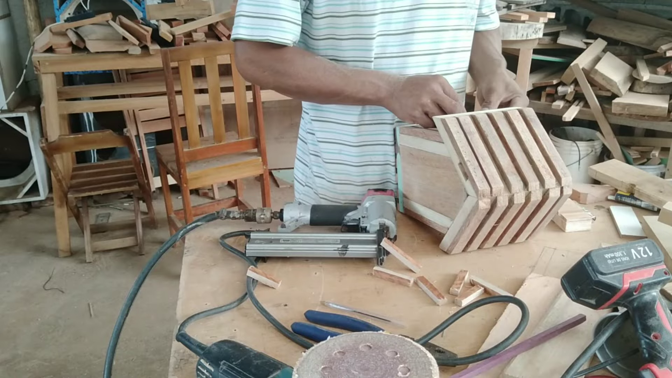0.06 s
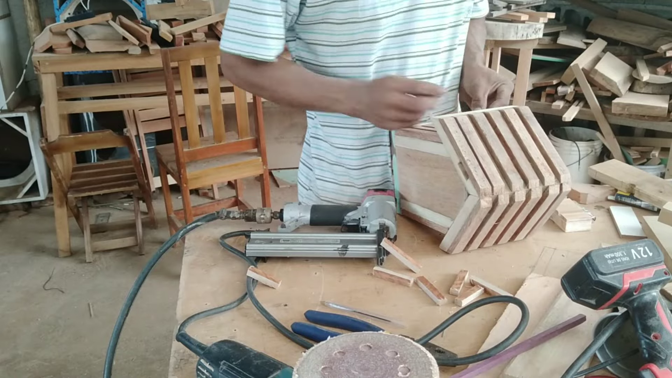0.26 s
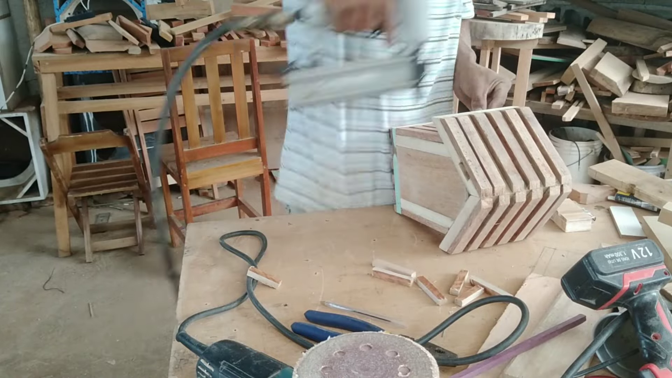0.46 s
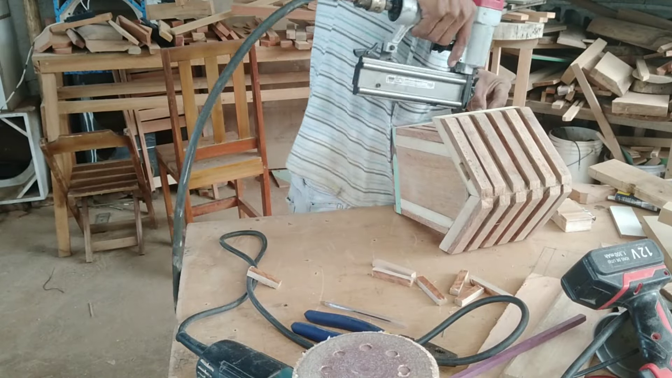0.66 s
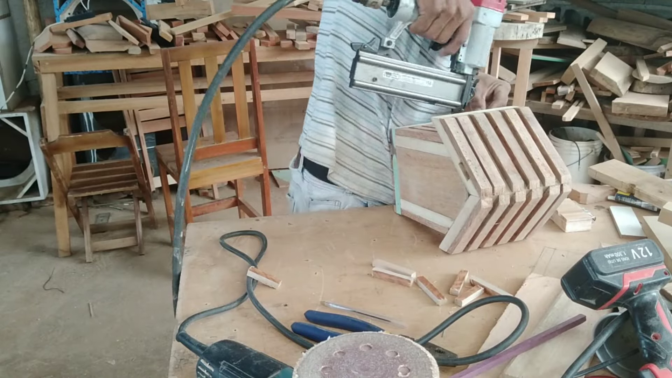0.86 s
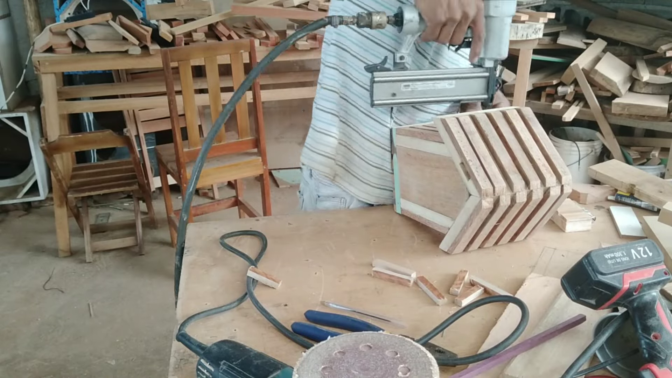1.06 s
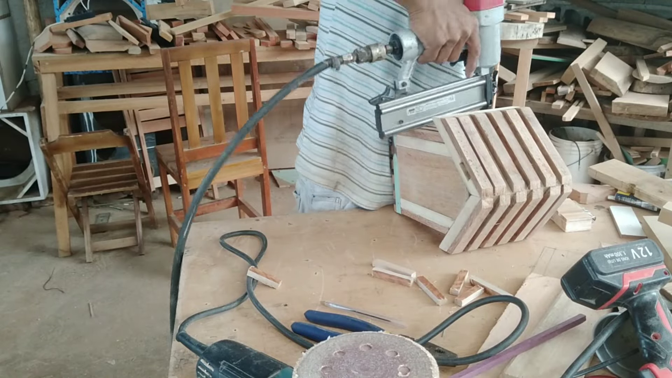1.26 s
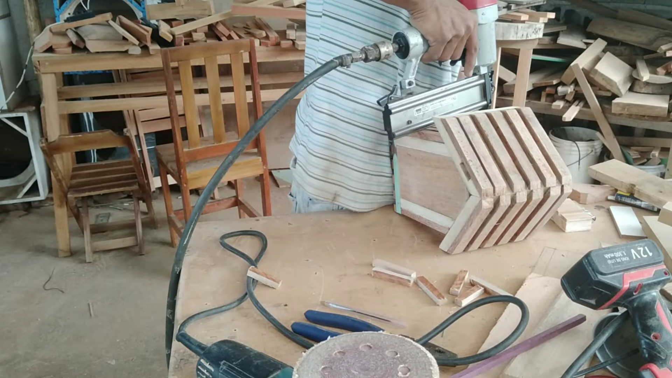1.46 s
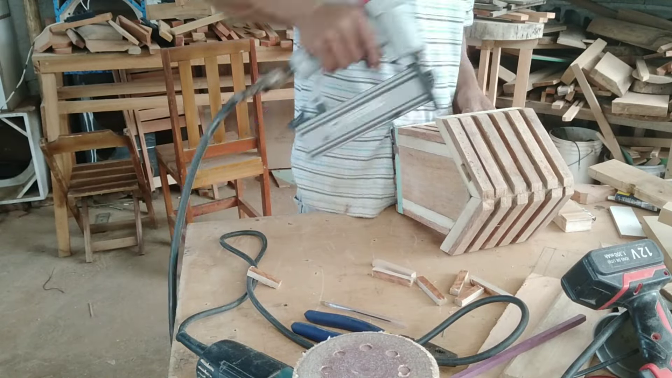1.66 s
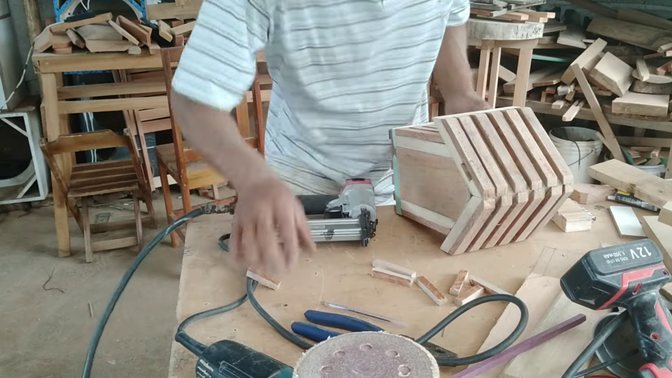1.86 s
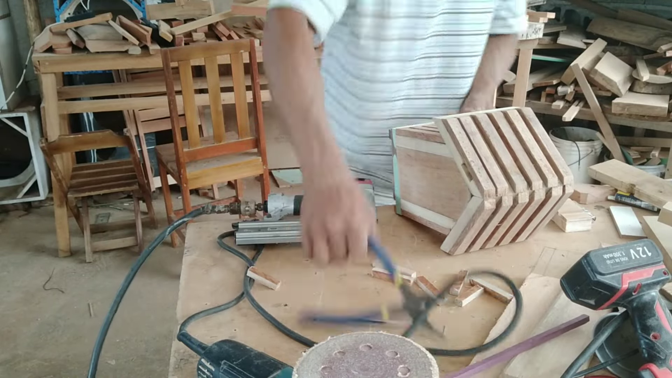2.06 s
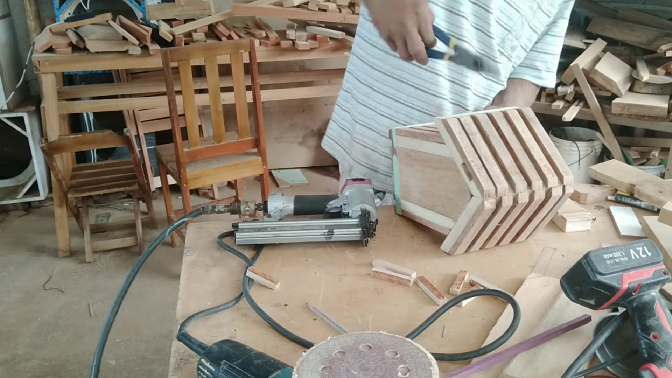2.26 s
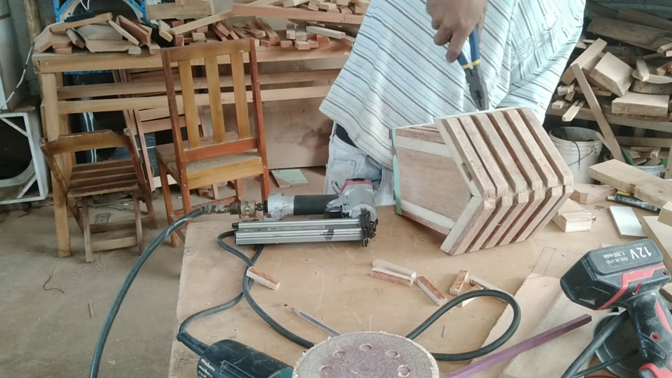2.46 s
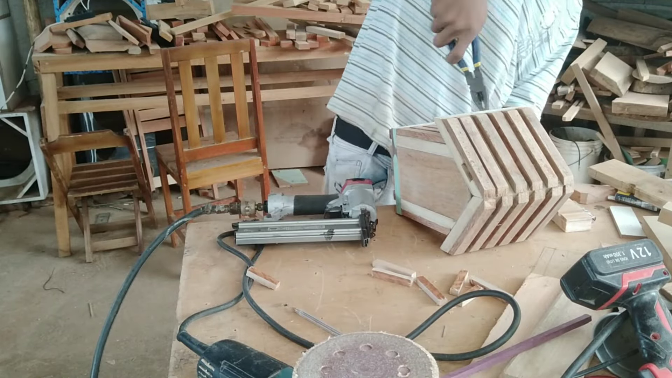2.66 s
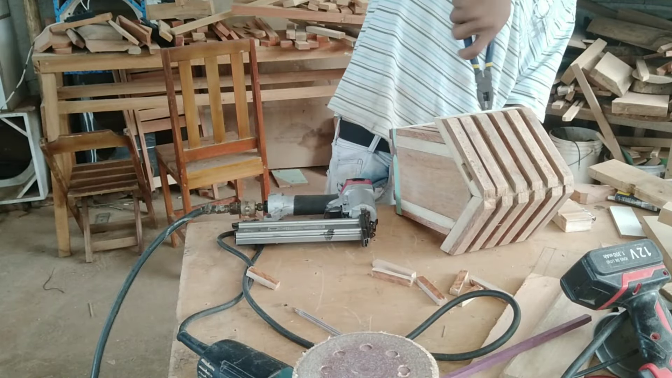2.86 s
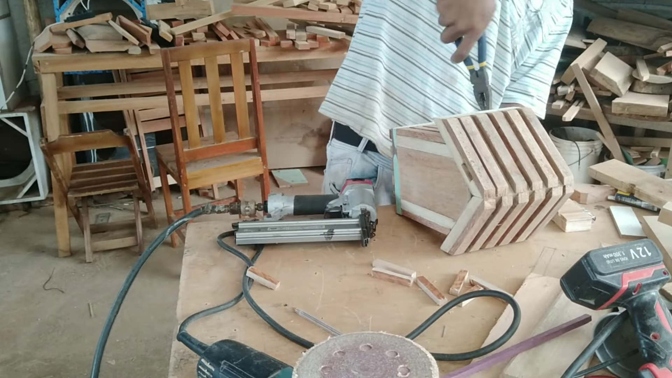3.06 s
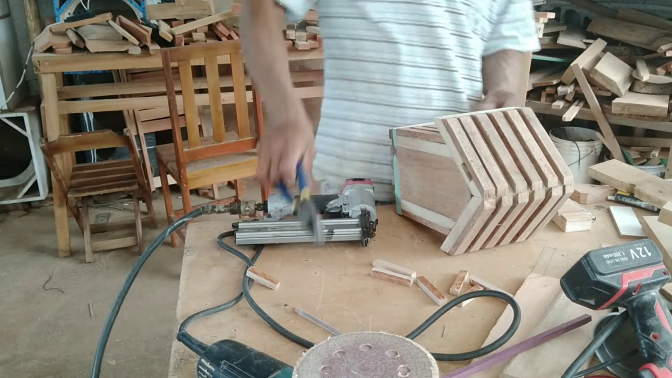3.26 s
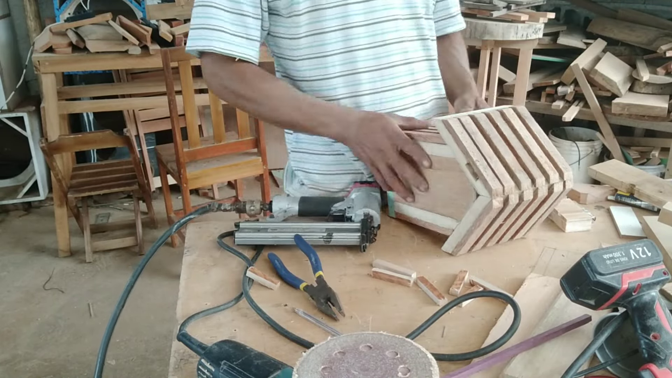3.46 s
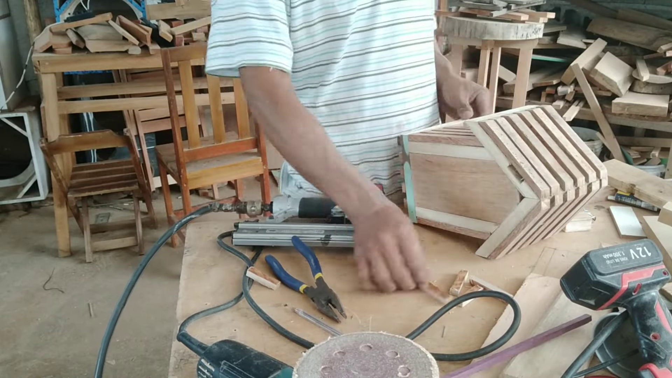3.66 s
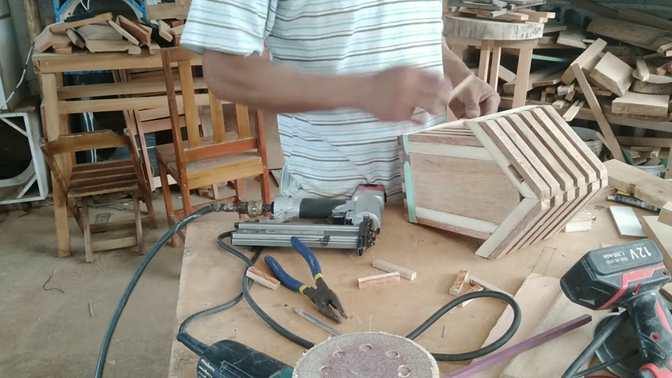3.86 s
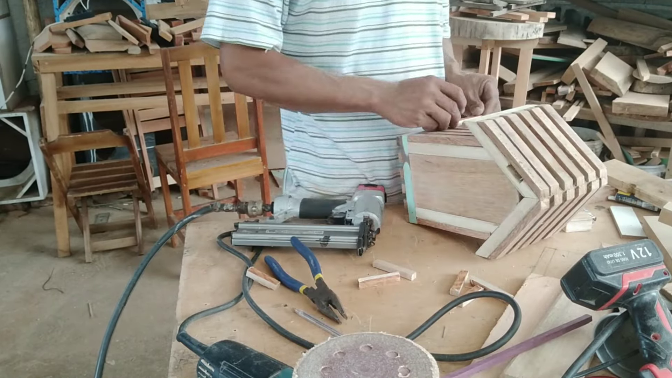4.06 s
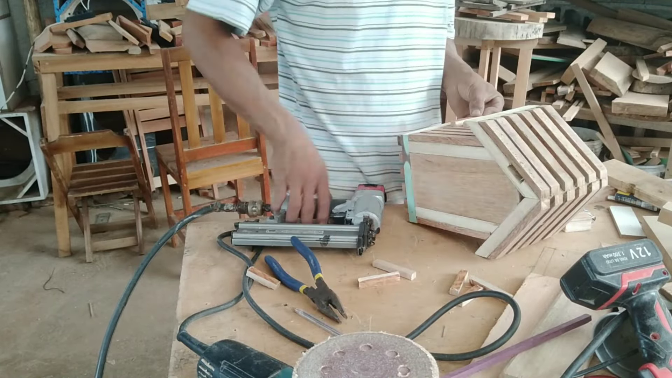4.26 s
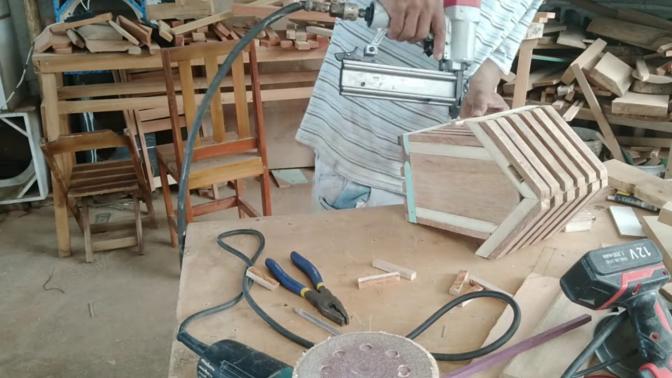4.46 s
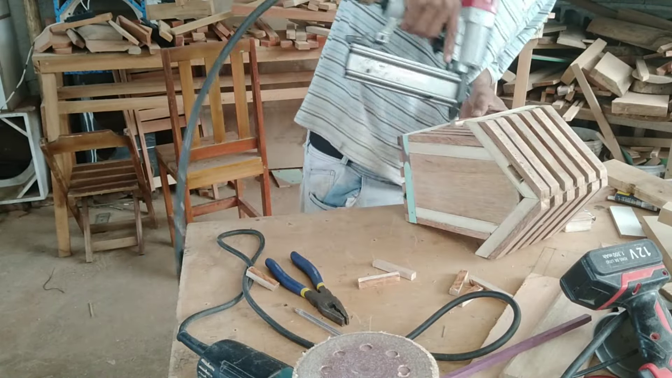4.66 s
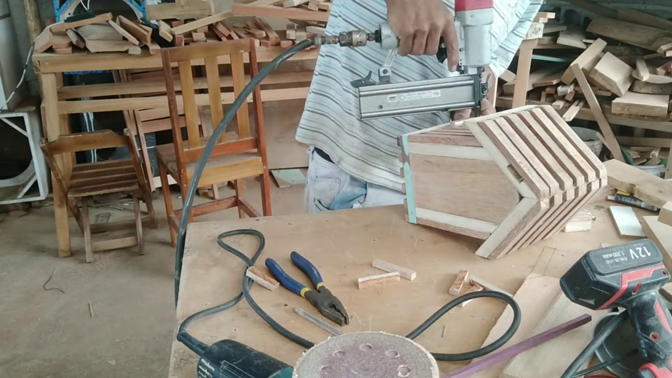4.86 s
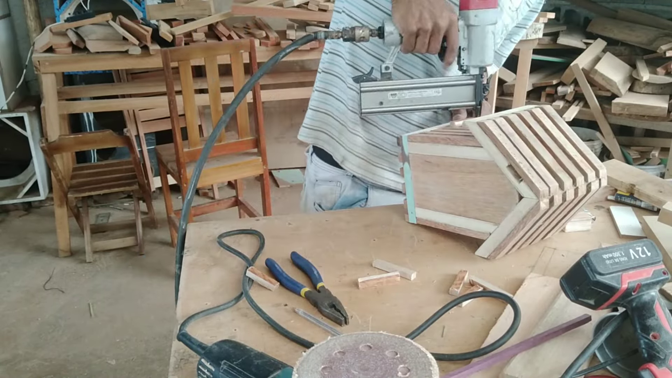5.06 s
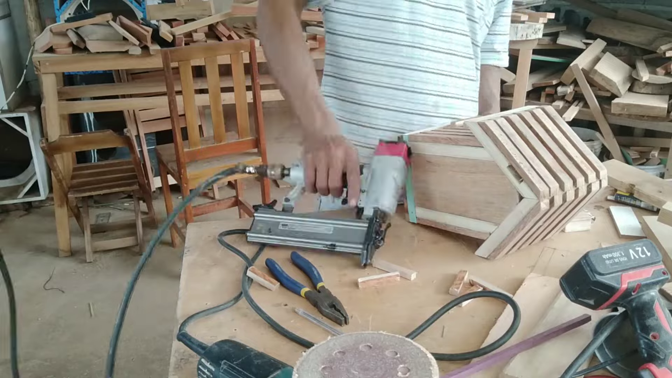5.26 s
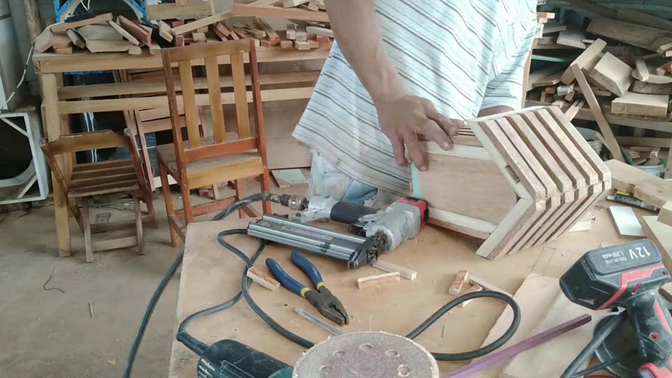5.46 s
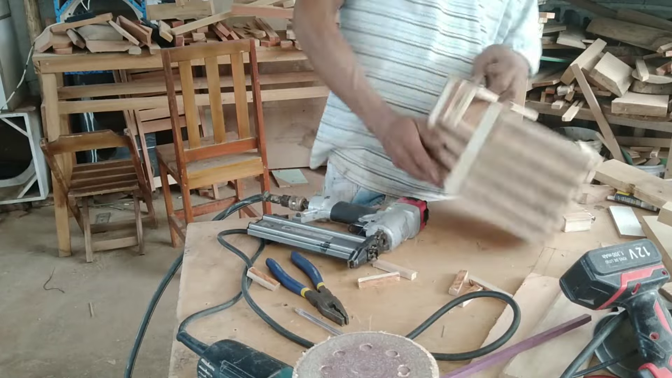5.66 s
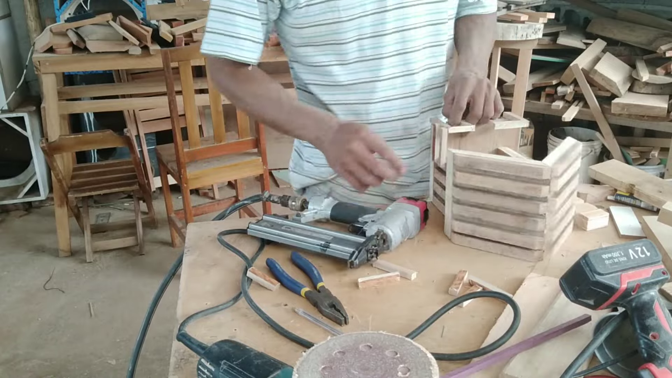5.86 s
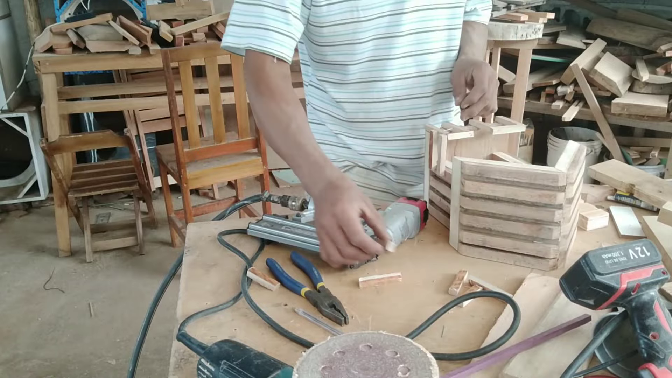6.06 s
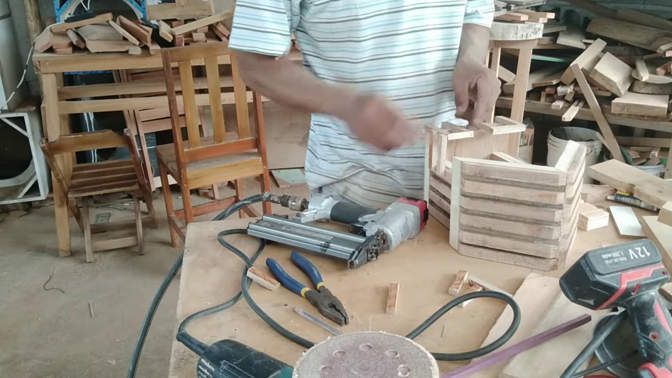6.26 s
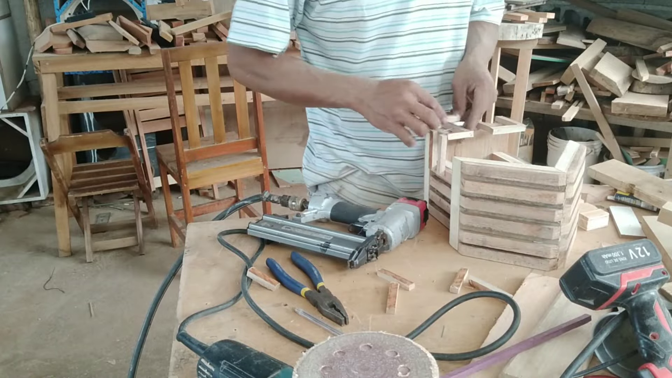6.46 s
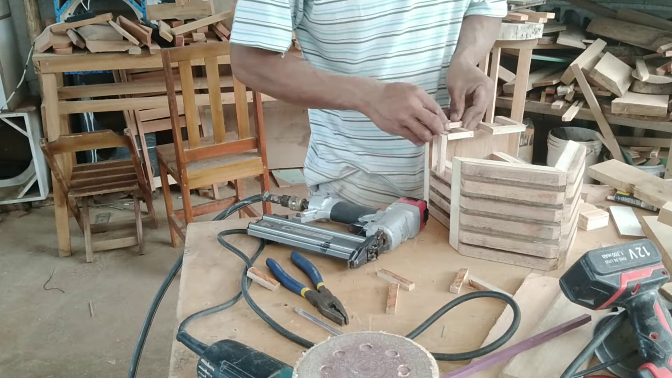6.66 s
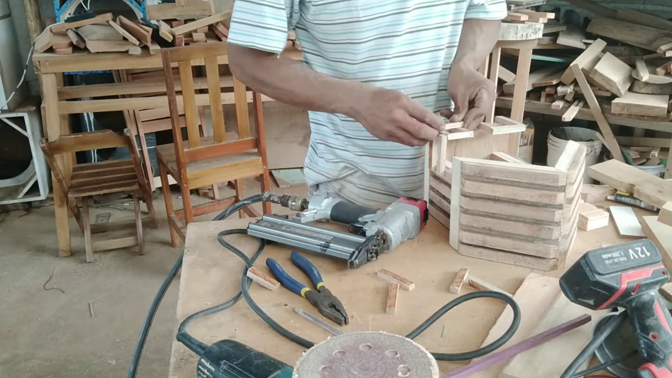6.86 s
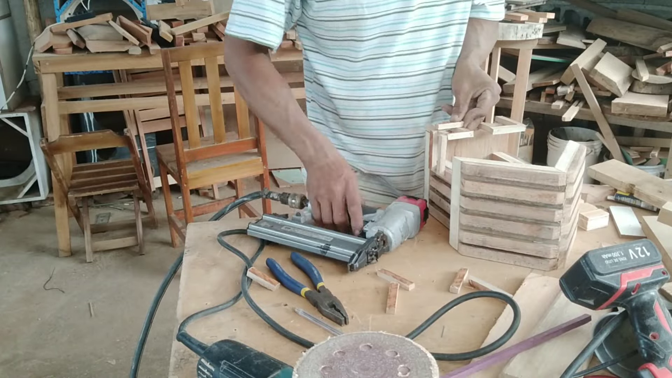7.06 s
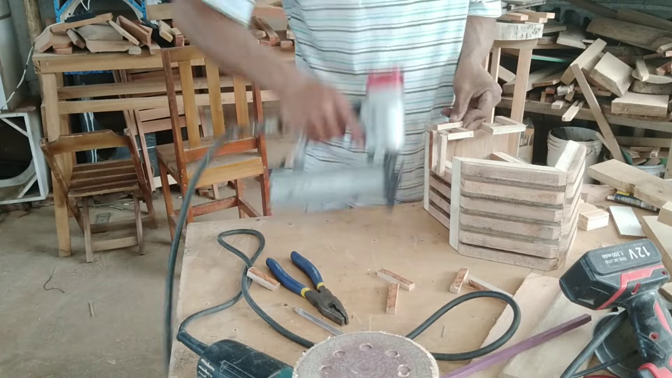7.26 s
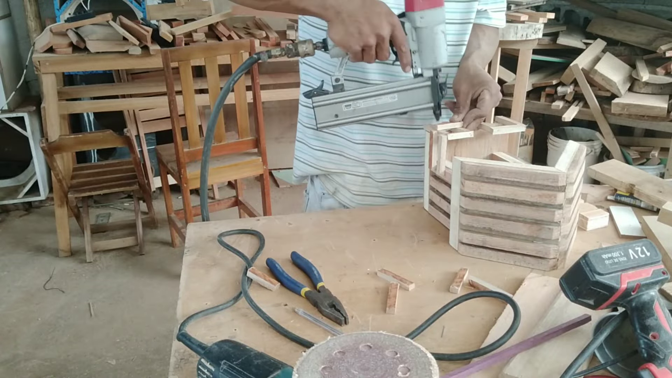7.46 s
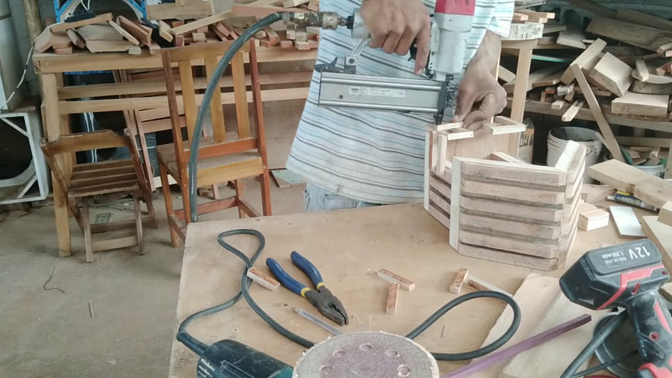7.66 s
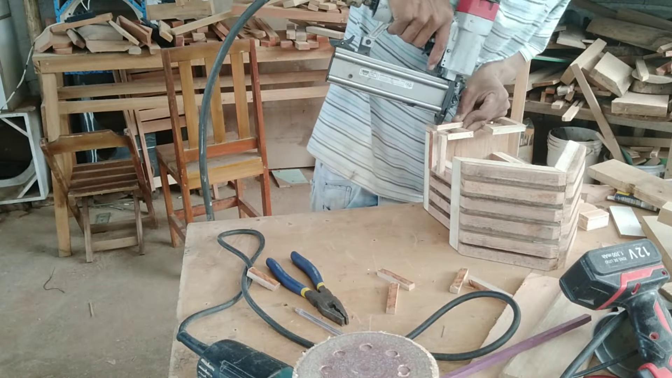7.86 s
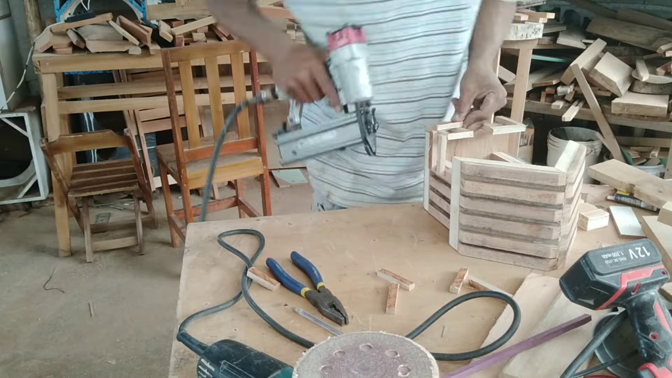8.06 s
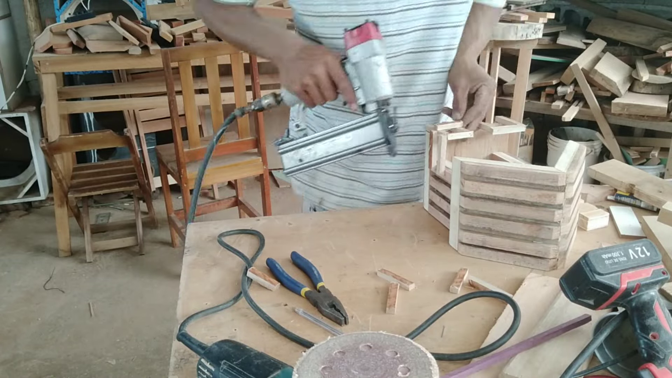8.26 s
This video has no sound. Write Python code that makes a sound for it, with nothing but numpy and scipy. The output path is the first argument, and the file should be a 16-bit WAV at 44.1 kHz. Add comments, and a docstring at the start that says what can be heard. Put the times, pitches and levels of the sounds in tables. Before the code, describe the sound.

Close, nearly dry workshop sound with low rumble and a steady airy hiss. Faint clicks come at 0.4-0.6 s, then a nailer snaps at 0.9 and harder at 1.5, each shot a short metallic chatter plus a puff of air. At 1.75-1.85 the tool clatters onto the bench; duller knocks follow around 2.1. After a quieter gap, pliers land at 3.3 with a hard knock and brief metal ring, followed by dry slat scuffs to 3.6. A heavy bump at 4.36 precedes the loudest, slightly overloaded crack at 4.64 and a lighter shot with strong exhaust at 5.06. The nailer goes down at 5.3-5.45 as the hiss drops away. The crate thuds over at 5.7. Small clicks, soft scuffs and weak hiss swells fill 5.9-7.8, quieter overall, with a modest knock at 7.16. A final snap and puff sound at 7.94, with a brief rise of hiss.

```python
"""Workshop bench: a pneumatic brad nailer fixes thin slats to a small wooden crate, near a phone.
Each shot is a chattering blow of the driver and a puff of exhaust air, made of noise through resonances.
Between shots tools and crate land, click, ring (dying sines) and scuff (noise through a damped mode).
Coloured noise makes a low rumble and a hiss that falls away after five seconds, then returns in swells."""
import sys
import numpy as np
from scipy import signal
from scipy.fft import rfft, irfft
from scipy.io import wavfile
from scipy.ndimage import uniform_filter1d

SR = 44100
rng = np.random.default_rng(int(sys.argv[2]) if len(sys.argv) > 2 else 0)


def persist_wave(psi):
    """Save psi, clipped to +-1, as 16-bit WAV."""
    counts = np.round(np.clip(psi, -1, 1) * 32767).astype(np.int16)
    wavfile.write(sys.argv[1], SR, np.atleast_2d(counts).T)


N = 366471
SIZE = 16384  # samples per event
LEAD = 200  # samples of lead-in before a contact
HZ = np.fft.rfftfreq(SIZE, 1 / SR)


def gain_of(db):
    """Decibels to gain."""
    return 10 ** (np.asarray(db) / 20)


def evened(x):
    """Scales to rms 1."""
    return x / np.sqrt(np.mean(x ** 2) + 1e-20)


def read(points, hz):
    """Reads a table on a log-frequency axis."""
    f, value = np.transpose(points)
    return np.interp(np.log(hz + 1), np.log(f + 1), value)


def level(points):
    """A (time [s], level [dB]) table as a gain for every sample."""
    return gain_of(np.interp(np.arange(N) / SR, *np.transpose(points)))


def add(mix, s, sound):
    """Mixes a sound in at time s."""
    part = mix[:, round(s * SR):][:, :sound.shape[1]]
    part += sound[:, :part.shape[1]]


def shape(colour, modes, hz):
    """A broad colour plus resonance peaks, in dB."""
    peaks_db = sum(db / (1 + (2 * (hz - centre) / width) ** 2) for centre, width, db in modes)
    return read(colour, hz) + peaks_db


# port balance: (frequency [Hz], left-right [dB])
PORT_BALANCE = [(60, -1), (400, 0), (800, -0.5), (1300, 9), (1800, 11.5), (2500, 4.5), (4000, -2.5),
                (6000, -3), (10000, 2), (15000, -2)]
# port likeness, near and diffuse sound: (frequency [Hz], correlation [-1..1])
NEAR_LIKENESS = [(60, 0.4), (130, 0.3), (300, 1), (640, 0.83), (950, 0.3), (1400, -0.52), (3000, -0.1),
                 (15000, 0)]
DIFFUSE_LIKENESS = [(60, 0.83), (130, 0.99), (300, 0.71), (640, 0.6), (1400, -0.31), (3000, 0.027)]


def ports(z, hz, likeness):
    """Two unrelated spectra become two microphone ports, correlated and balanced by frequency."""
    same = np.clip(read(likeness, hz), -1, 1)
    right = same * z[0] + np.sqrt(1 - same ** 2) * z[1]
    lean = gain_of(read(PORT_BALANCE, hz) / 2)
    return np.array([z[0] * lean, right / lean])


def causal(db):
    """Minimum-phase response of a gain curve: it rings only after the blow."""
    log_gain = np.log(gain_of(np.concatenate([db, db[-2:0:-1]])))
    return np.exp(np.conj(signal.hilbert(log_gain)))[:len(HZ)]


def chatter(length_s, rise_s, t60_s, grain_db, punch):
    """Whitened spectrum of a force: a first punch, then uneven micro-impacts that hold and die."""
    t = np.arange(SIZE) / SR
    onset = (1 - np.exp(-t / rise_s)) * (1 + punch * np.exp(-t / 0.0081))
    envelope = onset * gain_of(-60 * np.maximum(t - length_s, 0) / t60_s)
    sizes = gain_of(grain_db * np.repeat(rng.standard_normal(SIZE // 32), 32))
    z = rfft(rng.standard_normal((2, SIZE)) * sizes * envelope)
    return z / np.sqrt(uniform_filter1d(abs(z) ** 2, size=90, axis=1) + 1e-12)


SLAT_WIDTH_HZ, SLAT_LIFT_DB = 290, 6.5


def strikes(rows, colour, modes, rise_s, t60_s, grain_db, punch):
    """A force drives a resonant body: bass and tilt set the contact, struck wood adds its note."""
    bass = 1 / (1 + (HZ / 400) ** 4)
    octaves = np.log2(1 + (HZ / 1200) ** 2) / 2
    # fade-in over the lead, so the burst starts without a step
    fade = np.minimum(np.arange(SIZE // 2) / LEAD, 1) ** 2
    out = np.zeros((2, N))
    for s, db, length_s, bass_db, tilt_db, pan_db, *notes_hz in rows:
        notes = [(hz, SLAT_WIDTH_HZ, SLAT_LIFT_DB) for hz in notes_hz]
        body_db = shape(colour, list(modes) + notes, HZ) + bass_db * bass + tilt_db * octaves
        force = ports(chatter(length_s, rise_s, t60_s, grain_db, punch), HZ, NEAR_LIKENESS)
        sound = irfft(force * causal(body_db))
        sound = np.roll(sound, LEAD, axis=1)[:, :SIZE // 2] * fade
        # level holds over the contact, not over the whole buffer
        sound = evened(sound) * np.sqrt((length_s + t60_s / 10) * SR / (SIZE // 2))
        add(out, s - LEAD / SR, sound * gain_of([[db + pan_db / 2], [db - pan_db / 2]]))
    return out


def rings(rows, modes):
    """A struck part rings in a few dying modes."""
    t, out = np.arange(SIZE) / SR, np.zeros((2, N))
    for s, db, *_ in rows:
        ring = np.zeros(SIZE)
        for hz, mode_db, t60_s in modes:
            ring += gain_of(mode_db - 60 * t / t60_s) * np.sin(2 * np.pi * (hz * t + rng.random()))
        add(out, s, gain_of(db) * (ring * (1 - np.exp(-t / 0.0013)))[None])
    return out


def wash(colour, modes, patchy_db, flutter_db):
    """Steady noise of rms 1: a colour, resonances, drifting patches and a shared flutter."""
    hz, frames = np.fft.rfftfreq(4096, 1 / SR), N // 1024 + 5
    real, imag = rng.standard_normal((2, 2, frames, len(hz)))
    patches = uniform_filter1d(rng.standard_normal((frames, len(hz))), size=5, axis=0)
    patches = evened(uniform_filter1d(patches, size=14, axis=1))
    flutter = evened(uniform_filter1d(rng.standard_normal((frames, 1)), size=3, axis=0))
    gain = gain_of(shape(colour, modes, hz) + patchy_db * patches + flutter_db * flutter)
    z = ports(real + 1j * imag, hz, DIFFUSE_LIKENESS) * gain
    return evened(signal.istft(z.transpose(0, 2, 1), nperseg=4096, noverlap=3072)[1][:, :N])


# rumble colour: (frequency [Hz], relative density [dB per Hz])
RUMBLE_COLOUR = [(20, -2.5), (45, -2), (62, 1.5), (80, -9.5), (100, -3), (135, -9), (250, -18.5),
                 (420, -20.5), (720, -24), (1100, -34), (2000, -47), (4000, -65), (8000, -65), (16000, -66)]
# rumble resonances: (frequency [Hz], width [Hz], lift [dB])
RUMBLE_MODES = [(66, 25, 1.5), (98, 19, 4), (787, 82, 6)]
# rumble level: (time [s], level [dB])
RUMBLE_LEVEL = [(0, -42), (1.3, -40.5), (2.6, -44), (4, -44.5), (5.2, -41), (5.8, -43), (6.7, -47),
                (7.4, -46), (8.3, -46)]


def rumble():
    """Low rumble of the shed: bass-heavy noise with slow level drift."""
    return level(RUMBLE_LEVEL) * wash(RUMBLE_COLOUR, RUMBLE_MODES, patchy_db=2.0, flutter_db=2.0)


# hiss drift until it dies away: (time [s], relative level [dB])
HISS_DRIFT = [(0.0, -52), (0.38, -52), (0.68, -49.5), (1.0, -47), (2.09, -47.5), (2.85, -47), (3.41, -52.5),
              (4.6, -47.5), (5.3, -51)]
# later swells of the hiss: (time [s], relative level [dB], hold [s])
HISS_SWELLS = [(5.522, -75.5, .14), (5.84, -73, .12), (5.99, -60, 0.14), (6.16, -57, 0.24),
               (6.66, -76, 0.014), (6.79, -79, 0.086), (7.045, -66.5, .03), (7.154, -73, 0.034),
               (7.701, -59, .08), (7.913, -54.5, 0.037), (7.98, -43, 0.017)]
STOP_S, STOP_FALL_DB_PER_S, LEFT_DB = 5.43, 326, -42  # LEFT_DB: trace that stays, re drift
SWELL_RISE_DB_PER_S, SWELL_FALL_DB_PER_S = 452, 290


def hiss_level():
    """The hiss drifts, dies away, and comes back in swells that rise, hold and fade."""
    t = np.arange(N) / SR
    gain = level(HISS_DRIFT) * gain_of(np.clip((STOP_S - t) * STOP_FALL_DB_PER_S, LEFT_DB, 0))
    for s, db, hold_s in HISS_SWELLS:
        rise_db = SWELL_RISE_DB_PER_S * np.maximum(s - t, 0)
        fall_db = SWELL_FALL_DB_PER_S * np.maximum(t - s - hold_s, 0)
        gain = np.maximum(gain, gain_of(db - rise_db - fall_db))
    return gain


# hiss colour: (frequency [Hz], relative density [dB per Hz])
HISS_COLOUR = [(100, -26.5), (300, -7.5), (480, 2.5), (620, 1), (900, -1.5), (1350, -2.5), (1800, -3.5),
               (2500, -5), (3300, -11.5), (4800, -19), (7000, -28.5), (10000, -39), (13000, -47),
               (16000, -49.5)]
# hiss resonances: (frequency [Hz], width [Hz], lift [dB])
HISS_MODES = [(460, 25, 2.5), (553.7, 16, 4), (1274, 41, 4), (1463, 61, 5.5), (1920, 40, 1),
              (2230, 63, 5.5), (2401, 72, 6.5), (2580, 120, 5)]


def hiss():
    """Workshop hiss: coloured noise under the hiss level."""
    return gain_of(5.0) * hiss_level() * wash(HISS_COLOUR, HISS_MODES, patchy_db=2.0, flutter_db=-0.12)


# tail decay: (frequency [Hz], t60 [s])
ROOM_DECAY = [(60, 0.14), (130, 0.19), (400, 0.031), (1500, .11), (5000, .1), (15000, .08)]


def room(x):
    """A short, dry tail of scattered noise follows each sound, longest in the bass."""
    _, t, z = signal.stft(rng.standard_normal((2, SR // 2)), SR, nperseg=256)
    hz = np.fft.rfftfreq(256, 1 / SR)
    tail = signal.istft(z * gain_of(-60 * t / read(ROOM_DECAY, hz)[:, None]), SR, nperseg=256)[1]
    tail = tail * np.minimum(np.arange(tail.shape[1]) / SR / 0.02, 1)  # 20 ms fade-in
    return signal.fftconvolve(x, tail / np.linalg.norm(tail[0]), axes=1)[:, :N]


# hose coupling moves: (time [s], level [dB])
COUPLING_MOVES = [(.645, -68), (1.755, -65), (4.31, -67), (5.315, -67), (5.37, -76), (7.53, -76.5)]
# coupling modes: (frequency [Hz], relative level [dB], t60 [s])
COUPLING_MODES = [(9240, 2, 0.17), (13440, -13, 0.12), (13900, 0.5, .14)]


def coupling_tinkles():
    """The hose coupling rings in high modes as the nailer moves."""
    return rings(COUPLING_MOVES, COUPLING_MODES)


# pliers dropped: (time [s], level [dB])
PLIERS_DROPS = [(3.337, -30)]
# pliers modes: (frequency [Hz], relative level [dB], t60 [s])
PLIERS_MODES = [(2940, 1, 0.07), (3080, -12, .08), (4870, -11.5, 0.073), (5430, -15, 0.083)]


def pliers():
    """The dropped pliers ring in their metal modes."""
    return rings(PLIERS_DROPS, PLIERS_MODES)


# dry slat scuffs: (time [s], level [dB], length [s], pitch [Hz])
SLAT_SCUFFS = [(3.121, -40.5, 0.024, 690), (3.517, -40.5, 0.046, 350), (3.619, -38, 0.016, 508),
               (5.659, -41, 0.031, 630), (6.809, -58, 0.065, 740), (6.825, -63.5, 0.048, 1460),
               (7.015, -57.5, 0.064, 766), (7.117, -54, 0.03, 700), (7.428, -64.5, 0.021, 1300),
               (7.756, -44.5, 0.031, 738)]


def scuffs(sharpness):
    """A swell of friction noise excites one damped mode of a slat."""
    out = np.zeros((2, N))
    for s, db, length_s, hz in SLAT_SCUFFS:
        count = int(length_s * SR)
        friction = rng.standard_normal(SIZE)[:count] * signal.windows.tukey(count, .5)
        mode = 1 / (1 + 1j * sharpness * (HZ / hz - hz / (HZ + 1))) ** 2
        sound = evened(irfft(rfft(friction, SIZE) * mode)[None])
        add(out, s, gain_of(db) * sound * np.sqrt(count / SIZE))
    return out


# clicks and scrapes of metal and slats:
# (time [s], level [dB], length [s], bass [dB], treble tilt [dB per octave])
LIGHT_CLICKS = [(0.418, -49.5, 0.064, 3, 0), (0.614, -39.5, 0.0047, 21.5, 6.5), (1.823, -49, 0.015, -5, 5),
                (1.946, -49, 0.024, -2, 0.5), (3.854, -41.5, 0.027, -8, -1), (4.362, -33.5, 0.0016, -2, 5),
                (5.279, -39.5, 0.014, -3, 5), (5.947, -53.5, 0.018, -8, -5), (6.139, -41, .03, 0.5, -3),
                (6.342, -33.5, 0.017, -18, -4), (6.91, -58, 0.0099, 7, -12), (7.032, -59, 0.021, 4, 8.5),
                (7.162, -47, .036, -4, -10), (7.247, -53.5, 0.024, -6, -5), (7.35, -63, 0.0084, -14, -12),
                (7.425, -65.5, 0.019, -4, -3), (7.513, -54, 0.0087, 2, -6), (7.531, -50, 0.022, 13.5, -2.5)]
# click colour: (frequency [Hz], relative density [dB per Hz])
CLICK_COLOUR = [(30, -22), (200, 3.5), (550, 5.5), (1200, 2), (2400, 1), (4000, -5), (6300, -10.5),
                (9000, -21.5), (16000, -37)]
# nailer body resonances, also for the blows: (frequency [Hz], width [Hz], lift [dB])
NAILER_MODES = [(352, 160, 3.5), (628, 80, 1.5), (1024, 68, 5), (1067, 26, 1.5), (1349, 70, 2),
                (1670, 96, 4.5), (1987, 42, 1.5), (2535, 190, 5.5), (2866, 16, 3), (3473, 63, 4.5),
                (4670, 64, 4), (5100, 57, 6.5), (5530, 110, 5), (6000, 200, 5), (7140, 40, 3),
                (8740, 49, 10), (9100, 110, 9.5)]
CLICK_PAN_DB = 0.5  # left-right


def clicks():
    """Light contacts: short scrapes of noise through the nailer resonances."""
    rows = [(*row, CLICK_PAN_DB) for row in LIGHT_CLICKS]
    return strikes(rows, CLICK_COLOUR, NAILER_MODES, rise_s=0.0021, t60_s=0.017, grain_db=1.5, punch=0.31)


# tools and crate landing: (time [s], level [dB], contact length [s], bass [dB],
# treble tilt [dB per octave], left-right [dB], rebound below the knock [dB])
LANDINGS = [(1.761, -30, 0.02, -0.5, 6, 1.5, 16), (1.775, -23.5, 0.0047, 18, -2, -3, 14),
            (1.8226, -20.5, 0.025, 4.5, 3, 2, 21), (2.057, -25.5, 0.008, 1, -13, 1, 14),
            (2.084, -18.5, .0023, -11, -18, -2.5, 33), (3.336, -11, 0.0067, -1.5, 1.5, -1, 8),
            (5.276, -27.5, .021, -9.5, 2.5, 0.5, 24), (5.425, -23, 0.023, 0, 2.5, 4, 19),
            (5.444, -19.5, .013, 8.5, 1, -1, 18.5), (5.661, -38, 0.0032, -18, -2, -5.5, 4.5),
            (5.701, -18.5, .029, 7, 1, 0, 24), (5.723, -14.5, .021, 0, .5, -2.5, 31),
            (5.984, -31.5, 0.0028, -4.5, -6.5, -2, 14.5), (7.163, -35, 0.021, 0.5, 5.5, -1, 21),
            (7.244, -47.5, .0046, -31, -17, 0, 17)]
# bench top modes: (frequency [Hz], relative level [dB], t60 [s])
BENCH_MODES = [(123, 6, 0.1), (156, -2, 0.06), (184.3, 0, 0.13), (276, 0, 0.15), (366, -6, 0.13)]


def bench_ring():
    """The bench top hums on in low modes after each knock."""
    return gain_of(-16.0) * rings(LANDINGS, BENCH_MODES)


# knock colour: (frequency [Hz], relative density [dB per Hz])
KNOCK_COLOUR = [(30, -11), (70, -5), (120, 3.5), (220, -3), (400, -3.5), (700, -7), (1200, -15.5),
                (2400, -25.5), (4000, -41), (7000, -49.5), (11000, -65), (16000, -85)]
# wood resonances: (frequency [Hz], width [Hz], lift [dB])
WOOD_MODES = [(190, 280, 4.4), (340, 59, 2.6), (538, 26, 1.1), (706, 28, 4.4), (1009, 81, 5.5),
              (1390, 130, 2), (2015, 110, 3.1), (2530, 60, 3)]
REBOUND_GAP_S, REBOUND_S = .0045, 0.032


def knocks():
    """Objects land on the bench, each with a weaker rattle to rest of the same tone."""
    rows = []
    for s, db, length_s, *tone, rebound_db in LANDINGS:
        rows.append((s, db, length_s, *tone))
        rows.append((s + length_s + REBOUND_GAP_S, db - rebound_db, REBOUND_S, *tone))
    return strikes(rows, KNOCK_COLOUR, WOOD_MODES, rise_s=0.00088, t60_s=0.038, grain_db=3.5, punch=0.41)


# one row per nail: (blow time [s], blow level [dB], chatter length [s], bass [dB],
# treble tilt [dB per octave], left-right [dB], slat note [Hz], trigger valve level [dB],
# exhaust delay [s], exhaust level [dB], exhaust length [s], exhaust tilt [dB per octave],
# piston return level [dB])
NAIL_SHOTS = [(.873, -16, 0.022, -3.5, -1, 4, 824, -43, .0405, -20.5, 0.014, 1.5, -35),
              (1.525, -10.5, 0.018, -6.5, -0.5, 1.5, 736, -59, .001, -15, 0.02, 3, -30),
              (4.6439, 0, .0072, -1, -2.5, 0.5, 1180, -24, 0.028, -13, 0.016, 3.5, -7),
              (5.0599, -22.5, .01, -6, 0, 5, 1521, -26, .021, -11, .021, 2.5, -10),
              (7.942, -16, .022, 5, -2, 4, 1760, -23.5, 0.041, -20, .016, 1, -32)]
# tones: (bass [dB], treble tilt [dB per octave], left-right [dB])
VALVE_TIMBRE = (-2, -1.5, 0)
MAGAZINE_TIMBRE = (-1.5, -2.2, 2)
RETURN_TIMBRE = (7, -.3, 1.5)
VALVE_LEAD_S, VALVE_S = .011, .027
MAGAZINE_GAP_S, MAGAZINE_DB, MAGAZINE_S = .003, -31.5, .013
EXHAUST_BASS_DB, EXHAUST_PAN_DB = 4, .3
RETURN_SHARE, RETURN_S = .75, 0.0091  # share of the exhaust length before the piston hits its stop


def firing():
    """Shot sequence: valve hiss, driver blow, nail strip rattle, exhaust puff, piston return."""
    metal, puffs = [], []
    for (s, db, length_s, bass_db, tilt_db, pan_db, slat_hz, valve_db,
         delay_s, vent_db, vent_s, vent_tilt_db, return_db) in NAIL_SHOTS:
        vent_at = s + delay_s
        puffs.append((s - VALVE_LEAD_S, valve_db, VALVE_S, *VALVE_TIMBRE))
        metal.append((s, db, length_s, bass_db, tilt_db, pan_db, slat_hz))
        metal.append((s + length_s + MAGAZINE_GAP_S, MAGAZINE_DB, MAGAZINE_S, *MAGAZINE_TIMBRE))
        puffs.append((vent_at, vent_db, vent_s, EXHAUST_BASS_DB, vent_tilt_db, EXHAUST_PAN_DB))
        metal.append((vent_at + RETURN_SHARE * vent_s, return_db, RETURN_S, *RETURN_TIMBRE, slat_hz))
    return metal, puffs


# air colour: (frequency [Hz], relative density [dB per Hz])
AIR_COLOUR = [(30, -10), (70, 0.5), (120, 9), (250, -0.5), (450, -7), (1000, -2), (2300, -1.5), (3500, -9),
              (6500, -12), (10000, -16.5), (13000, -25), (16000, -27.5)]
# exhaust port resonances: (frequency [Hz], width [Hz], lift [dB])
EXHAUST_MODES = [(1010, 70, 4.5), (1376, 63, 2), (2640, 250, 4), (3207, 200, 4), (5256, 78, 7),
                 (5760, 140, 3), (6320, 180, 6), (6640, 81, 4.5)]


def nailer_air(puffs):
    """Valve and exhaust air: noise bursts through the port resonances."""
    return strikes(puffs, AIR_COLOUR, EXHAUST_MODES, rise_s=0.0017, t60_s=0.05, grain_db=-0.5, punch=.1)


# nailer bumped as it is snatched up: (time [s], level [dB], length [s], bass [dB],
# treble tilt [dB per octave], left-right [dB], wood note [Hz])
NAILER_BUMP = [(4.3591, -7, 0.0054, 2.5, -10, -1, 1380)]
# blow colour: (frequency [Hz], relative density [dB per Hz])
BLOW_COLOUR = [(30, -14), (80, -3.5), (160, -1), (400, -4.5), (750, -2), (1300, -3.5), (2000, -8),
               (3200, -10.5), (5500, -15.5), (8000, -21.5), (11000, -27), (16000, -40)]


def nailer_blows(metal):
    """Driver, nail strip, piston and bump: chattering forces ring the nailer body."""
    rows = metal + NAILER_BUMP
    return strikes(rows, BLOW_COLOUR, NAILER_MODES, rise_s=0.0013, t60_s=0.0057, grain_db=0.5, punch=1.0)


def scene():
    """Workshop air, bench work and nailer."""
    background = rumble() + hiss()
    small = coupling_tinkles() + pliers() + scuffs(sharpness=4.1)
    contacts = clicks() + knocks()
    metal, puffs = firing()
    air, blows = nailer_air(puffs), nailer_blows(metal)
    echo = room(gain_of(-22) * blows + gain_of(-23.0) * air + gain_of(-20.5) * (contacts + small))
    return background + small + bench_ring() + contacts + air + blows + echo


EDGE_HZ = 16000


def record(dry):
    """The loudest peaks overload the phone (soft clip); then the band limit."""
    clipped = dry / (1 + dry ** 12) ** (1 / 12)
    lowpass = signal.firwin(401, EDGE_HZ, window=("kaiser", 8), fs=SR)
    return signal.oaconvolve(clipped, lowpass[None], "same")


dry = scene()
out = record(dry)
persist_wave(out)
```